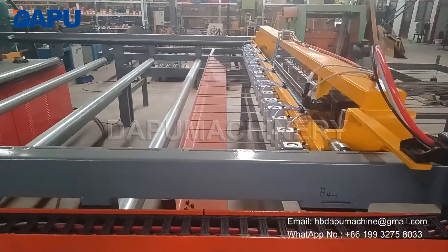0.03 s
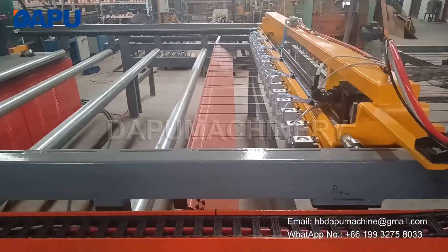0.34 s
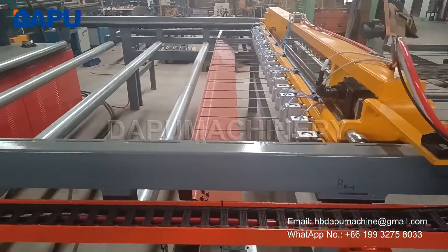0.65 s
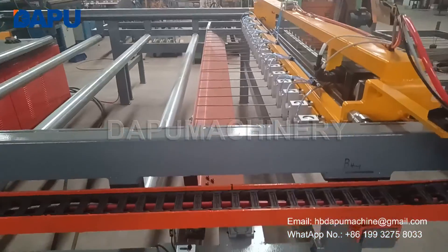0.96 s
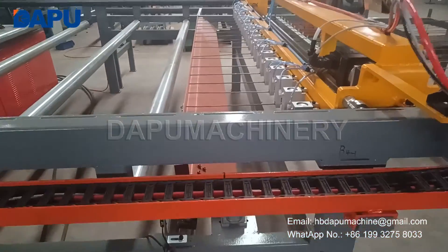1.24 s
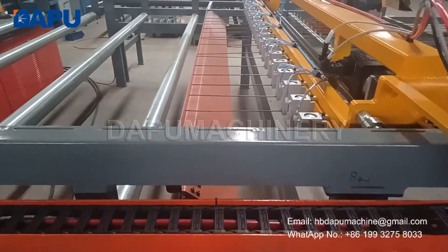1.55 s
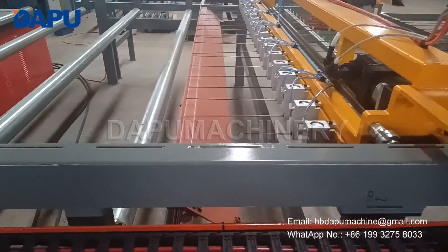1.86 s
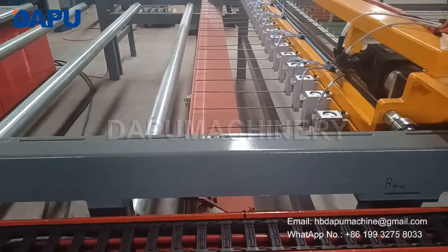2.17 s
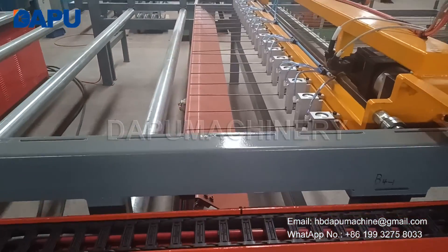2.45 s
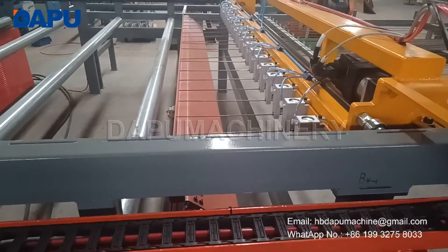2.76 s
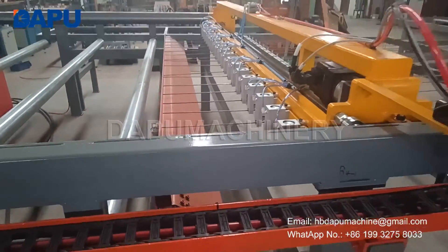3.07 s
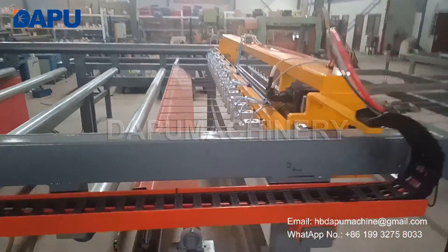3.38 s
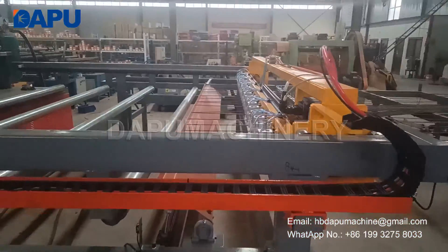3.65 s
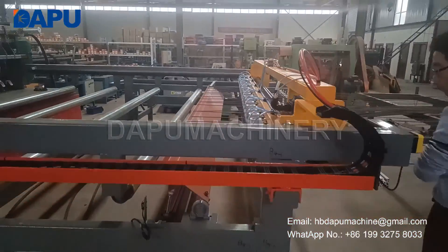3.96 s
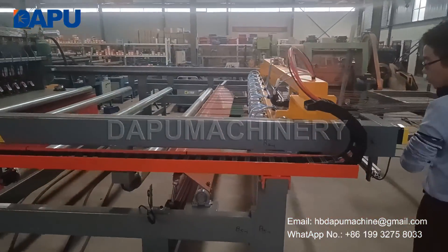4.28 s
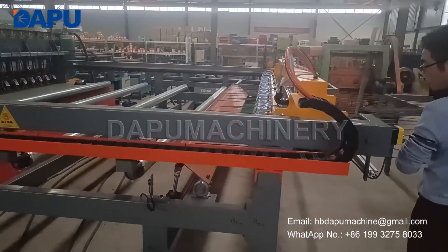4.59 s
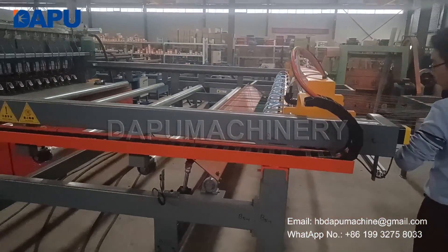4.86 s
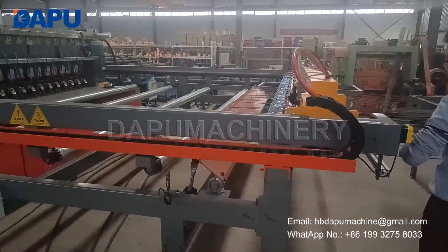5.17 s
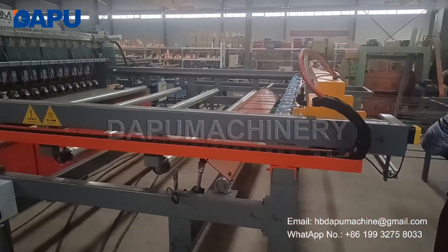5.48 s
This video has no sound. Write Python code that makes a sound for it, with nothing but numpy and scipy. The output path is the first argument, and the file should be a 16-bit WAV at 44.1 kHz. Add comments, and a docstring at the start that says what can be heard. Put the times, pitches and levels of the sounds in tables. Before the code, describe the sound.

A steel mesh welding machine cycles close by in a mildly echoing factory hall, over a steady low motor drone and a faint air leak. It starts with a hiss, a thin valve whistle and a clank at 0.2 seconds. Softer air bursts and dull thumps come around 1 second. Strong hisses follow from 1.7 to 2.2, with small wire squeaks and carriage rattle, ending in a loud steel clank at 2.35. After a lull, air vents at 3.1, and a hiss with another clank lands at 3.4. Wire squeals in its guides from 3.6 to 4.5, sharpest at about 3.9, overlapped by loud air bursts between 4.1 and 4.5. A puff and a hard, ringing clank come at 4.85, a lighter ringing strike at 5.4, and two short spits of air around 5.6 seconds.

```python
"""In a factory hall, a steel mesh welding machine works through its cycle close by.
Air cylinders vent as turbulent jets, and valves spit and whistle. Clamps and stops strike and ring
in their natural modes, wire squeals by stick-slip friction in its guides and the carriage rattles.
Beneath it all lie a faint leak of air and the drone of motors and transformers, with brief low
swells in the rumble that are heard as dull thumps."""
import sys
import numpy as np
from scipy import signal
from scipy.fft import rfft, irfft, next_fast_len
from scipy.io import wavfile
from scipy.ndimage import uniform_filter1d, map_coordinates

SR = 44100
rng = np.random.default_rng(int(sys.argv[2]) if len(sys.argv) > 2 else 0)


def bounce(signal):
    """Save signal as a 16-bit WAV file at the path given by the first command-line argument."""
    frames = np.transpose(np.atleast_2d(signal))
    limited = np.clip(frames, -1, 1)
    pcm = np.round(limited * 32767).astype(np.int16)
    wavfile.write(sys.argv[1], SR, pcm)


N = 252693
TIME = np.arange(N) / SR

# exhaust events: t/s, opening time/s, time open/s, relative level/dB, tilt/(dB per octave), valve
VENTS = [(-.06, .03, 0.067, -25.5, -2.5, "feed"), (.1, 0.038, 0.11, -31.5, -4, "feed"),
         (.465, 0.0092, 0.015, -40, -2.5, "pilot"), (.875, 0.08, 0.23, -31.5, -3, "lift"),
         (1.01, 0.053, 0.29, -29, -2, "lift"), (1.489, 0.033, 0.12, -29.5, -1.5, "pilot"),
         (1.729, 0.037, 0.079, -21.5, 0.5, "press"), (1.80, 0.049, 0.075, -21, 3.5, "press"),
         (1.97, 0.05, 0.16, -27.5, -1, "press"), (2.15, 0.046, 0.16, -31, -4.5, "press"),
         (2.338, 0.0095, 0.0097, -22, 1, "press"), (3.092, 0.075, 0.19, -29.5, 0, "lift"),
         (3.355, 0.016, 0.038, -21.5, -1, "press"), (3.61, 0.027, 0.17, -36.5, -3, "lift"),
         (3.84, 0.073, 0.24, -28.5, -0.5, "return"), (4.11, 0.031, 0.041, -20.5, -2, "return"),
         (4.164, 0.013, 0.14, -21.5, 1, "return"), (4.44, 0.02, 0.072, -25.5, 0.5, "return"),
         (4.65, 0.018, 0.11, -37, -2, "return"), (4.814, 0.033, 0.018, -23, -3, "press"),
         (4.97, 0.02, 0.021, -51, -12, "press"), (5.3, 0.015, 0.11, -43, -6, "feed")]
# peaks and dips of each valve's exhaust port: f/Hz, width/Hz, gain/dB
VALVE_RESONANCES = { "feed": [(4470, 1500, -4), (6800, 500, 4), (8200, 1800, 2), (15000, 2500, -2)],
                    "lift": [(4600, 1800, 1.5), (6300, 900, 0.5), (11900, 1600, 3), (14000, 1500, 2.5)],
                    "pilot": [(3000, 590, 3.5), (7340, 240, 12.5), (9550, 210, 8), (10900, 260, 9),
                    (13000, 300, 10), (14400, 600, 4)], "press": [(4700, 190, 1), (6740, 210, 3),
                    (8370, 1300, 0), (14600, 1500, -4)], "return": [(5300, 170, 2), (6570, 270, -0.5),
                    (7100, 540, 2), (10200, 400, -2), (12500, 500, 2.5)]}
# natural modes of each steel part: f/Hz, relative level/dB, T60/s
PART_MODES = { "clamp": [(562, 3.5, 0.3), (632, -2, 0.45), (756, -11, 0.24), (1448, -1, 0.8),
              (1508, 2, 0.38), (2420, -7, .3), (3040, 2, 0.22), (3246, -5, 0.3), (3338, 2, .2),
              (5000, -3, 0.25), (5850, 1, .12)], "jaws": [(258, -8.5, .5), (533, 1, 0.3), (632, 2, 0.7),
              (777, -4, 0.42), (1440, -11, 0.7), (1652, 0, 0.5), (1935, -4, .3), (2377, 4, 0.27),
              (2960, 3, 0.3), (3205, 1, 0.55), (3295, 5, 0.5), (4140, 1, 0.27), (4985, 5, 0.45),
              (5130, 3, .2), (6250, 0, .2)], "frame": [(500, -3, 0.3), (625, 3, 0.35), (746, -2.5, 0.26),
              (868, -3, 0.19), (1133, -1.5, 0.42), (1388, -1, 0.3), (1434, -10, 0.88), (1657, -5, 0.9),
              (1937, -1, 0.4), (2215, -5, .3), (2476, 0, 0.35), (5340, -1, .2)],
              "gripper": [(535, -7, 0.45), (602, -7, 0.37), (745, -6, 0.2), (1556, -10, 0.5),
              (1965, -13, 0.4), (2085, -7, 0.2), (2982, -6, 0.25), (3100, 0, 0.16), (3335, -6, 0.4),
              (4156, -6, 0.2), (4756, 4, 0.17), (4880, 3, 0.22), (5005, 3, 0.22), (5940, -6, 0.19)],
              "stop": [(613, 7.5, 0.16), (686, -3, .2)]}
# coherence of the left and right channels: f/Hz, correlation coefficient
COHERENCE = [(30, .88), (90, .965), (170, .97), (330, .945), (650, .9), (1000, .6), (1500, .35), (2500, 0),
             (16000, 0)]


def air_jets():
    """Turbulent jet noise, filtered by the resonances of the exhaust ports and the steelwork."""
    jet_spectrum = [(60, -35), (700, -26), (1150, -19.5), (1500, -12.5), (1900, -11), (2500, -4.5),
                    (3500, -0.5), (5000, 2), (7000, 1), (9000, 1.5), (10000, 0), (11000, -0.5),
                    (12600, -0.5), (13200, -7), (15200, -6), (15700, -9)]  # turbulence: f/Hz, relative level/dB
    steelwork = [(1390, 40, 7), (2600, 26, 5.5), (2580, 33, 6), (3110, 49, 6.5)]  # resonances that every jet excites: f/Hz, width/Hz, gain/dB
    turbulence = colour(noise(N), jet_spectrum, ripple_db=2.86)
    hz, t, bands = signal.stft(turbulence, SR, nperseg=2048, noverlap=1536)
    level_db, tilt, side_db, share = venting(t)
    port_db = np.transpose([peaks(steelwork + VALVE_RESONANCES[valve], hz) for *_, valve in VENTS])
    octaves = np.log2(np.maximum(hz, 3000) / 6000)
    # reflections from nearby steel comb the sound with drifting peaks and dips
    comb = uniform_filter1d(rng.standard_normal(bands.shape[1:]), size=3, axis=0)
    comb = unit(uniform_filter1d(comb, size=16, axis=1))
    bands = bands * amp(port_db @ share + octaves[:, None] * tilt + 3.26 * comb)
    jet = signal.istft(bands, SR, nperseg=2048, noverlap=1536)[1][:, :N]
    envelope = amp(np.interp(TIME, t, level_db) - 3.0 + 0.65 * wander(50))
    return jet * sides(np.interp(TIME, t, side_db)) * envelope


def venting(t):
    """Incoherent jets add in power: gives level, tilt and balance at times t, and each vent's share."""
    build_db_per_s = 15  # the flow builds while a valve stays open
    fade_db_per_s, dull_db_per_octave_s = 59, 16.5  # once it shuts, the hiss fades and dulls in the hall
    jet_side_db, echo_side_db, echo_s = 0.7, -3.5, 0.082  # the jet is ahead, its echo to the right
    start, opening, length, db, brightness = np.transpose([row[:-1] for row in VENTS])[:, :, None]
    age, shut = np.maximum(t - start, 0), np.maximum(t - start - length, 0)
    flow_db = db + build_db_per_s * (age - shut) - fade_db_per_s * shut
    power = (ramp(age, opening) * amp(flow_db)) ** 2 + 1e-14
    tilt = brightness - dull_db_per_octave_s * shut
    side_db = echo_side_db + (jet_side_db - echo_side_db) * np.exp(-shut / echo_s)
    share = power / power.sum(0)
    return 10 * np.log10(power.sum(0)), (share * tilt).sum(0), (share * side_db).sum(0), share


def clanks():
    """Impact excitation: closing steel faces give a crack, a dense crash, a thud and modal ringing."""
    # clamps, jaws and stops: t/s, level/dB, relative thud/dB, tilt/(dB per octave), closing time/s,
    # relative crack/dB, relative ring/dB, part struck
    impacts = [(.2, -28.5, 5, 3, 0.019, 2, -16, "clamp"), (.236, -43, -3, 2, 0.0094, -6, 7, "clamp"),
               (1.165, -52, 10, -3, 0.015, -20, -6, "frame"), (1.733, -41, 3, 2, 0.01, -10, -7, "jaws"),
               (1.992, -38, -4, -2, 0.01, -8, -8, "frame"), (2.215, -45, 11, -3, 0.016, -12, 1, "jaws"),
               (2.345, -29, -10, 3, 0.008, -2, -20, "jaws"), (2.352, -21.5, 0, 3, 0.014, 0, -8, "jaws"),
               (2.698, -47, -2, 1, 0.004, -2, -10, "frame"),
               (3.372, -25.5, 7, 1, 0.008, -10, -5.5, "frame"), (3.400, -33, 5, 1, 0.009, -3, -12, "frame"),
               (3.715, -38, -4, -2, 0.012, -10, -8, "frame"), (4.368, -49, 0, 0, 0.012, -6, 2, "jaws"),
               (4.659, -34, 1, 1, 0.029, -15, -30, "frame"),
               (4.842, -23.5, -2.5, 2.5, 0.0079, -2, -3, "gripper"),
               (4.864, -32, 6, 2, 0.005, -3, -8, "gripper"),
               (4.918, -42, 13, -5, 0.0052, -10, 0, "gripper"),
               (5.055, -53, 13, 4, 0.0074, -6, -18, "jaws"),
               (5.372, -36.5, -3, 1.5, 0.011, 0, 1, "gripper"), (5.552, -56, 6, 0, 0.014, -12, 10, "stop")]
    crash_spectrum = [(150, -12), (500, 9.5), (750, -0.5), (1050, -3), (1600, 1.5), (2050, 3), (2500, 2.5),
                      (3300, 5), (5000, -9), (7500, -2.5), (11000, -21), (15500, -54)]  # dense resonances: f/Hz, relative level/dB
    crack_spectrum = [(800, -33), (1900, -10), (3000, -3), (5500, 8), (7500, -2), (10500, -9), (15500, -24)]  # snap of the faces meeting: f/Hz, relative level/dB
    thud_spectrum = [(90, -48), (190, -8.5), (260, -2.5), (340, -6.5), (430, -5.5), (520, 6.5), (700, 3.5),
                     (900, -6.5), (1400, -14.5)]  # low body of the blow: f/Hz, relative level/dB
    out, t = np.zeros((2, N)), np.arange(SR) / SR
    hz = np.geomspace(100, 16000, 300)
    octaves = np.log2(np.maximum(hz, 2000) / 4000)
    for start, db, thud_db, tilt, closing, crack_db, ring_db, part in impacts:
        chatter = amp(1.7 * wander(130)[:SR])
        seating = 0.005 / closing * np.exp(-((t - closing) / 0.0058) ** 2)  # faster closing seats harder
        tilted = np.column_stack([hz, read(crash_spectrum, hz) + tilt * octaves])
        crash = colour(noise(SR), tilted, ripple_db=5.0) * chatter * (decay(t, 0.062) + seating)
        contact_age = t - 0.4 * closing  # the first faces meet partway through the closing
        crack = colour(noise(SR), crack_spectrum, ripple_db=17.0) * chatter
        crack *= ramp(contact_age, 0.0018) * decay(contact_age, 0.033)
        thud = colour(noise(SR), thud_spectrum) * decay(t, 0.041) * (1 - decay(t, 0.014))
        body = crash + amp(thud_db) * thud + amp(ring_db) * ring(PART_MODES[part], t)
        add(out, start, amp(db) * (amp(crack_db) * crack + ramp(t, closing) * body))
    return hall(out, wet_db=-13.0)


def squeals():
    """Stick-slip friction: irregular slips in the guides drive the bending modes of the steel wire."""
    drags = [(0, 0.14, -41.5), (1.06, 0.03, -35), (1.265, 0.04, -36), (1.56, 0.043, -36.5),
             (1.719, 0.059, -30), (1.84, 0.16, -37.5), (1.983, 0.025, -37), (2.758, 0.02, -43),
             (3.597, 0.036, -34), (3.661, 0.05, -24), (3.908, 0.02, -30), (3.926, 0.038, -18),
             (3.967, 0.014, -25), (4.055, 0.16, -31.5), (4.25, 0.24, -36), (4.645, 0.037, -33.5)]  # pulls through the guides: t/s, duration/s, relative level/dB
    wire_modes = [(1660, -17, 0.6), (1940, -14, 0.5), (2250, -6, 0.12), (2488, -1.5, 0.25), (2557, 0, .1),
                  (2628, 2, 0.16), (2765, 3, 0.15), (2846, 3, 0.15), (2950, -2, 0.1), (3075, -2, 0.2),
                  (3150, -2, .1), (3327, -5, .1), (3520, -3, .07), (3960, -2, 0.08)]  # bending modes: f/Hz, relative level/dB, T60/s
    scrape_spectrum = [(100, -55), (900, -12), (1500, -14.5), (2000, -9), (2400, 6), (2750, -9), (3400, -3),
                       (6000, -8), (12000, -13)]  # friction noise: f/Hz, relative level/dB
    slips_per_s, pitch_spread = 2300, 0.00292  # spread: rms fraction of the pitch
    rubbing = activity(drags, rise_s=0.016, fall_s=0.036)
    slips = rng.uniform(-1.05, 1, N) * (rng.random(N) < slips_per_s / SR)
    wire = resonate(slips, wire_modes)
    # the free length of wire changes, and its pitch with it
    warped = np.arange(N) + np.cumsum(pitch_spread * wander(23.7))
    wire = np.array([map_coordinates(side, [warped], order=3, mode="mirror") for side in wire])
    scrape = colour(noise(N), scrape_spectrum, ripple_db=2.5)
    chatter = amp(0.82 * np.tanh(wander(200)))
    return hall(rubbing * (amp(-2.0) * wire + amp(-8.5) * scrape * chatter), wet_db=-7.0)


def carriage():
    """Random impacts: chain links and loose wires knock with the travel and excite the frame's modes."""
    runs = [(-.03, 0.029, -36.5), (0.105, 0.27, -44), (1.134, 0.18, -66), (1.711, 0.23, -39.5),
            (2.158, 0.11, -42.5), (3.606, 0.093, -43.5), (3.933, 0.042, -39), (4.047, 0.24, -43),
            (4.35, 0.21, -50.5), (4.65, 0.058, -55)]  # carriage movements: t/s, duration/s, relative level/dB
    rattle_spectrum = [(250, -55), (420, 3.5), (560, 3), (630, 4.5), (700, 5), (850, -0.5), (1100, -2.5),
                       (1600, 2.5), (2300, -22), (4000, 3), (12000, -48)]  # loose parts: f/Hz, relative level/dB
    knocks_per_s, idle_db = 1100, -58.5  # loose parts never quite rest
    travel = activity(runs, rise_s=0.031, fall_s=0.07)
    knocks = rng.uniform(-0.76, 1, (2, N)) * (rng.random(N) < knocks_per_s / SR)
    frame = resonate(knocks[0], PART_MODES["frame"])
    rattle = colour(knocks, rattle_spectrum, ripple_db=6.5) + amp(-6.0) * frame
    flicker = amp(2.9 * np.tanh(wander(43)))
    return hall(rattle * np.hypot(travel, amp(idle_db)) * flicker, wet_db=-13.0)


def spits():
    """Transient jets: the pilot valve empties at once, and reverberation carries the hiss on."""
    releases = [(5.555, -35), (5.659, -38)]  # puffs of air: t/s, level/dB
    puff_spectrum = [(1500, -28), (4000, -4), (6500, -3), (9000, 1), (10000, -4), (11500, -4), (14000, -2),
                     (15800, -9)]  # crisp hiss: f/Hz, relative level/dB
    out, t = np.zeros((2, N)), np.arange(SR // 4) / SR
    hz = np.geomspace(1000, 16000, 300)
    spectrum = np.column_stack([hz, read(puff_spectrum, hz) + 0.69 * peaks(VALVE_RESONANCES["pilot"], hz)])
    puff = pulse(t, rise_s=0.011, fall_s=0.014)
    for start, db in releases:
        add(out, start, amp(db) * puff * colour(noise(len(t)), spectrum))
    return hall(out, wet_db=0.5)


def whistles():
    """Edge tones: air across a valve edge sings a narrow, fluttering band of noise."""
    notes = [(0, 0.15, 6540, -41), (0, 0.32, 2450, -47), (1.88, 0.17, 2990, -42.5)]  # valve tones: t/s, duration/s, f/Hz, relative level/dB
    flutter_hz = 90
    out = np.zeros((2, N))
    for start, length, hz, db in notes:
        gate = ramp(TIME - start, 0.0041) * ramp(start + length - TIME, 0.061)
        flutter = wander(flutter_hz) + 1j * wander(flutter_hz)
        out += gate * amp(db) * (flutter * np.exp(2j * np.pi * hz * TIME)).real
    return hall(out * amp(2.5), wet_db=-6.0)


def thumps():
    """Tone bursts: brief low swells in the machine's rumble, a few cycles long, heard as dull thumps."""
    swells = [(0.109, 161, -35), (0.199, 163, -31.5), (0.756, 185, -29.5), (1.159, 271, -32.5),
              (1.231, 181, -33), (2.729, 193, -36), (3.289, 175, -41), (3.375, 323, -32), (3.515, 180, -38),
              (3.624, 185, -33), (4.898, 286, -34)]  # swells in the rumble: t/s, f/Hz, level/dB
    out, t = np.zeros((2, N)), np.arange(SR // 4) / SR
    envelope = pulse(t, rise_s=0.018, fall_s=0.017)
    for start, hz, db in swells:
        add(out, start, amp(db) * envelope * np.sin(2 * np.pi * hz * t)[None])
    return hall(out, wet_db=-24.0)


def drone():
    """Forced vibration of motors and transformers: a churning rumble and wavering hum lines."""
    rumble_levels = [(0, -42), (.22, -43.5), (.66, -41.5), (.92, -47.5), (1.18, -39), (1.5, -47),
                     (1.7, -41), (2.05, -43.5), (2.25, -41.5), (2.98, -45.5), (3.25, -40.5), (3.92, -45.5),
                     (4.2, -42), (4.72, -44.5), (4.8, -51.5), (4.88, -41), (5.45, -45), (5.73, -43.5)]  # course of the rumble: t/s, relative level/dB
    rumble_spectrum = [(25, -29), (50, -24.5), (80, -20), (125, -5.5), (160, -3), (195, 1.5), (220, 0.5),
                       (265, 1), (350, -4), (430, -6), (540, -14.5), (800, -21), (1200, -31), (2000, -38)]  # machinery noise: f/Hz, relative level/dB
    hum_lines = [(100, -67.5), (146, -65), (185, -53.5), (263, -64.5)]  # machinery tones: f/Hz, level/dB
    churn_db = 4 * np.tanh(wander(34))
    level_db = np.interp(TIME, *np.transpose(rumble_levels)) + churn_db + 1.03
    out = colour(noise(N), rumble_spectrum, ripple_db=3.5) * amp(level_db)
    for hz, db in hum_lines:
        gain = amp(db + 2.0 * wander(1.4))
        pitch_hz = hz + 3 * wander(7.03)
        out += gain * np.sin(2 * np.pi * np.cumsum(pitch_hz) / SR)
    return out


def leak():
    """Steady turbulence: escaping compressed air hisses faintly from the right."""
    hiss_spectrum = [(700, -8.5), (1150, -8), (1500, 0), (1850, -9), (2300, 4), (3200, 0.5), (5000, 3.5),
                     (6500, -1), (9000, -10), (12500, -15.5), (15500, -20)]  # leaking air: f/Hz, relative level/dB
    hiss = colour(noise(N), hiss_spectrum, ripple_db=3.0)
    return hiss * sides(-3.0) * amp(-45.5 + 0.24 * wander(6.4))


def hall(x, wet_db):
    """Reverberation: adds a diffuse tail in which each band decays at its own rate."""
    decay_times = [(150, 1), (600, 0.7), (1500, 0.97), (3500, 0.99), (7000, 1), (14000, 0.41)]  # reverberation time: f/Hz, T60/s
    hz, t, bands = signal.stft(colour(noise(SR), [(1, 0), (SR, 0)]), SR, nperseg=256)
    fade = amp(-60 * t / read(decay_times, hz)[:, None])
    tail = signal.istft(bands * fade * (1 - decay(t, 0.01)), SR, nperseg=256)[1]
    return x + amp(wet_db) * signal.fftconvolve(x, tail / np.linalg.norm(tail[0]), axes=1)[:, :N]


def colour(x, spectrum, ripple_db=0):
    """Spatial coherence: filters two unrelated signals to a spectrum; long waves reach both sides alike."""
    size = next_fast_len(x.shape[1])
    hz, (left, other) = np.fft.rfftfreq(size, 1 / SR), rfft(x, size)
    coherence = np.clip(read(COHERENCE, hz), -1, 1)
    stereo = np.array([left, coherence * left + np.sqrt(1 - coherence ** 2) * other])
    knots = np.arange(0, SR / 2, 45)  # a fine random ripple stands for dense resonances
    depth = np.minimum(hz / 1000, 1) / np.sqrt(1 + (hz / 9000) ** 2)  # high ones overlap and even out
    ripple = ripple_db * depth * np.interp(hz, knots, rng.uniform(-np.sqrt(3), np.sqrt(3), len(knots)))
    return unit(irfft(stereo * amp(read(spectrum, hz) + ripple), size)[:, :x.shape[1]])


def ring(modes, t):
    """Free vibration: a sum of damped modes, the higher ones differing in phase between the sides."""
    contact_s = 0.00021  # steel needs this long to start ringing
    out = np.zeros((2, len(t)))
    for hz, db, t60 in modes:
        phase = rng.uniform(0, 2 * np.pi)
        shift = rng.choice([-1, 1]) * np.arccos(np.clip(read(COHERENCE, hz), -1, 1))
        out += amp(db - 60 * t / t60) * np.sin(2 * np.pi * hz * t + [[phase], [phase + shift]])
    return out * ramp(t, contact_s)


def resonate(force, modes):
    """Linear response: the force convolved with the ringing of the modes, at rms 1."""
    return unit(signal.fftconvolve(force[None], ring(modes, np.arange(SR // 2) / SR), axes=1)[:, :N])


def peaks(resonances, hz):
    """Gain in dB of a row of bell-shaped resonances."""
    return sum(db / (1 + (2 * (hz - centre) / width) ** 2) for centre, width, db in resonances)


def activity(events, rise_s, fall_s):
    """Summed envelopes of events that rise, hold and die away."""
    return sum(amp(db) * ramp(TIME - start, rise_s) * decay(TIME - start - length, fall_s)
               for start, length, db in events)


def pulse(t, rise_s, fall_s):
    """A linear rise, then an exponential fall."""
    return ramp(t, rise_s) * decay(t - rise_s, fall_s)


def ramp(t, rise_s):
    """Linear rise from 0 to 1."""
    return np.clip(t / rise_s, 0, 1)


def decay(t, fall_s):
    """Exponential decay from 1, beginning at t = 0."""
    return np.exp(-np.maximum(t, 0) / fall_s)


def noise(samples):
    """Two independent white noises."""
    return rng.standard_normal((2, samples))


def wander(rate_hz):
    """Low-pass random fluctuation of rms 1."""
    hz = np.fft.rfftfreq(N, 1 / SR)
    return unit(irfft(rfft(rng.standard_normal(N)) * np.exp(-(hz / rate_hz) ** 2), N))


def sides(db):
    """Stereo gains for a level difference, left minus right, in dB."""
    return amp(np.array([[.5], [-.5]]) * db)


def amp(db):
    """Decibels to gain."""
    return 10 ** (np.asarray(db) / 20)


def unit(x):
    """Scales to rms 1."""
    return x / np.sqrt(np.mean(x ** 2) + 1e-20)


def read(points, hz):
    """Interpolates a table on a log-frequency axis."""
    f, value = np.transpose(points)
    return np.interp(np.log(hz + 1), np.log(f + 1), value)


def add(mix, start_s, sound):
    """Adds a sound into the stereo mix."""
    part = mix[:, max(round(start_s * SR), 0):][:, :sound.shape[1]]
    part += sound[:, :part.shape[1]]


def scene():
    """Superposition of all the machine's sources."""
    return (drone() + leak() + air_jets() + spits() + clanks() + thumps()
            + squeals() + carriage() + whistles())


def record(dry):
    """Directivity: the right microphone faces the working parts and hears more treble; then a low-pass."""
    balance = [(100, 1), (500, -1.2), (1200, -0.7), (2500, -2), (8000, -3.5), (13000, -1.1)]  # microphone imbalance: f/Hz, left minus right level/dB
    heard = irfft(rfft(dry) * sides(read(balance, np.fft.rfftfreq(N, 1 / SR))), N)
    low_pass = signal.firwin(511, cutoff=15850, window=("kaiser", 9), fs=SR)
    return signal.oaconvolve(heard, low_pass[None], "same")


dry = scene()
out = record(dry)
bounce(out)
```